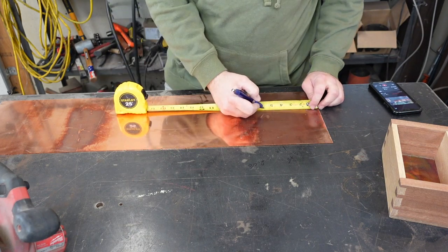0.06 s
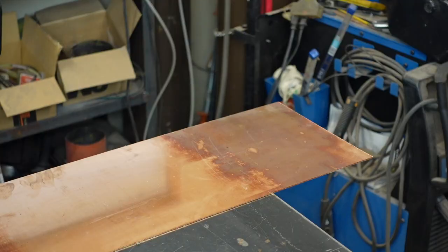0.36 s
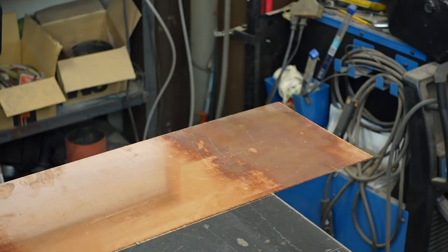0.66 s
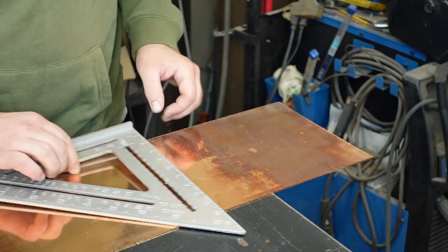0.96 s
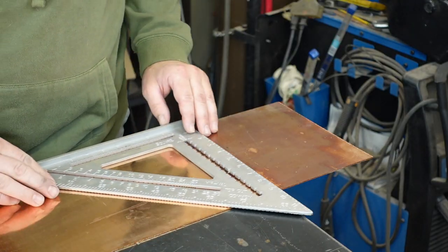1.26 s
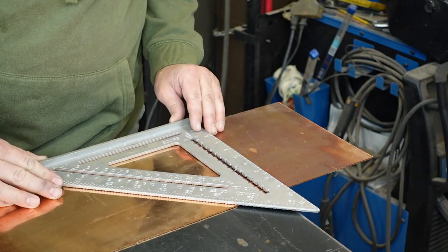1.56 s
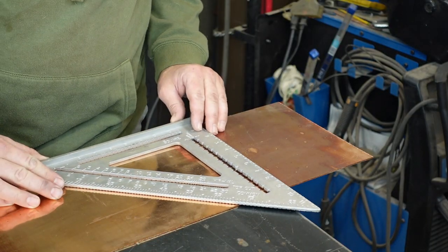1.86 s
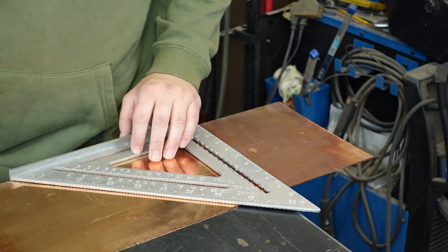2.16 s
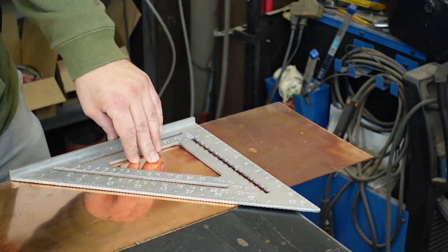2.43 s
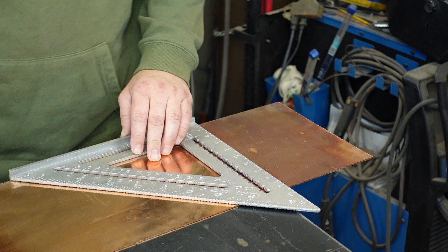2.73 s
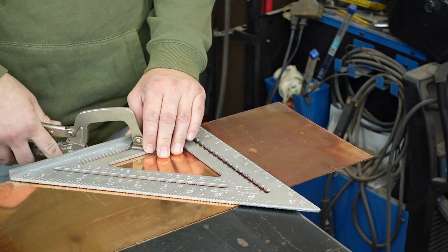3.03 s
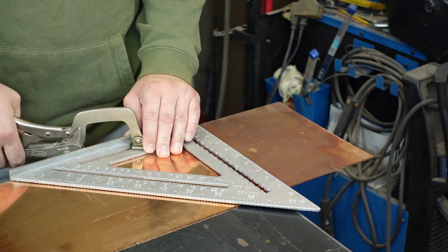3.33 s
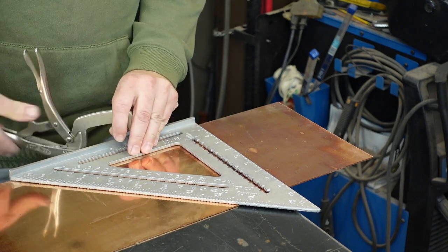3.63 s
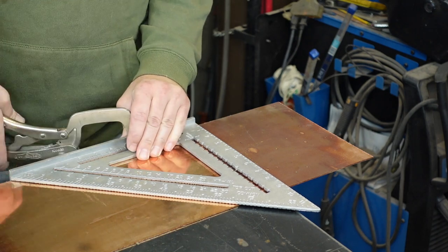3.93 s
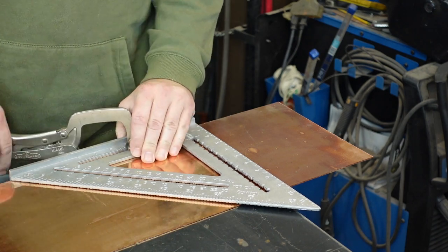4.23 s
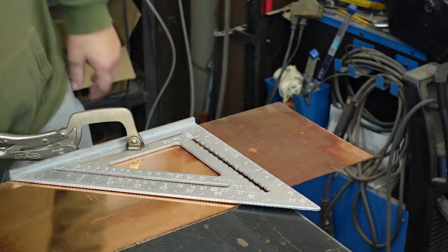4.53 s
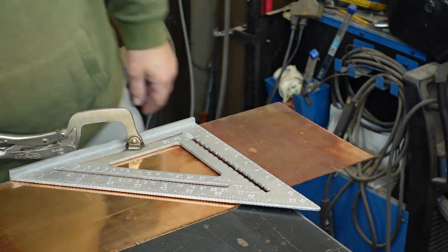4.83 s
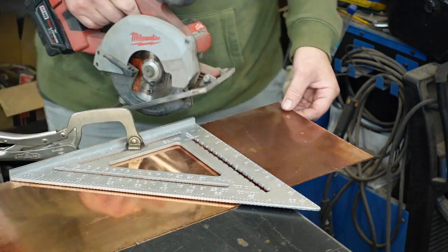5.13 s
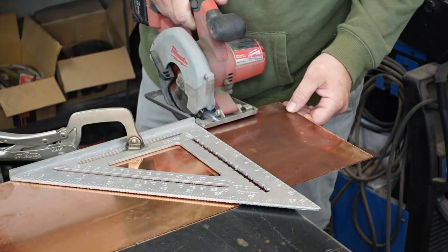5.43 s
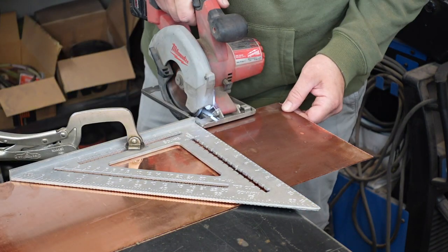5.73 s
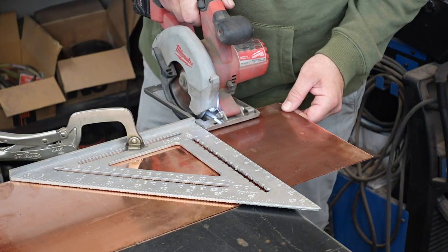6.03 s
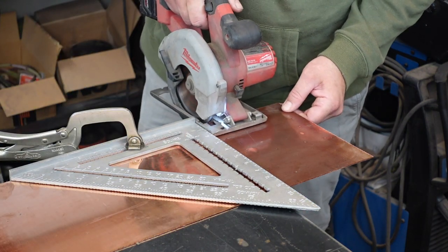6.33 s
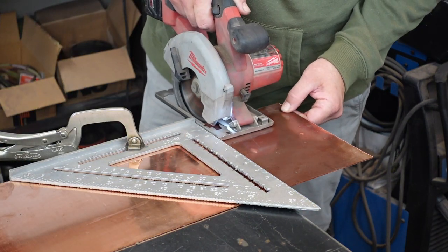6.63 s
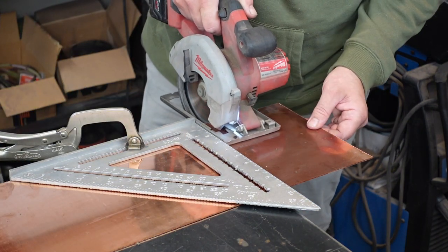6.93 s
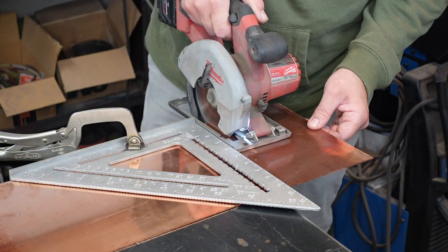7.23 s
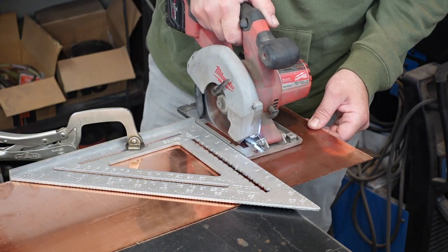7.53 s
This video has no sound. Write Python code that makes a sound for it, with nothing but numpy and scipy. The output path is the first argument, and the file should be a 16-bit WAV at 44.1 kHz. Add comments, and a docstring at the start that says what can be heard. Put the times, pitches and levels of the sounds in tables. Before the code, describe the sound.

A faint low rumble fills a small workshop with little echo, heard on the left channel only. After a soft bump at 0.2 seconds, a copper sheet scrapes briefly across a bench and lands with a ringing knock at about 0.5. A metal square clacks onto it at 1 second, followed by faint rubbing and a lull. Near 2.6 come a rub and another knock. A steel clamp rattles and snaps at 3, 3.5, 3.8 and, hardest, 4.1 seconds, with thin high pings. Light taps and soft rubs follow from 4.7 to 5.4. At 5.7 a trigger clicks and a cordless circular saw spins up quickly to a high, airy whine. At 6.5 it bites into the sheet with a loud, harsh, ringing rasp. The blade swells into a squeal around 7.2, and the cutting continues to the end, at about 7.6 seconds.

```python
"""Clamping and sawing sheet metal

A copper sheet is shifted on a workbench, and an aluminium square is laid on it and clamped down.
Knocks and scrapes make the metal ring; the clamp snaps and rattles. A cordless circular saw spins up,
runs free, then bites into the sheet, and its teeth set the blade ringing. The small workshop has
a low rumble and little echo. There is one microphone, on the left channel only."""
import sys
import numpy as np
from scipy import signal
from scipy.fft import rfft, irfft
from scipy.io import wavfile
from scipy.ndimage import uniform_filter1d

SR = 44100
rng = np.random.default_rng(int(sys.argv[2]) if len(sys.argv) > 2 else 0)


def generate_wav(signal):
    """Clip the signal to [-1, 1] and save it as 16-bit WAV at the path in sys.argv[1]."""
    frames = np.transpose(np.atleast_2d(signal))
    scaled = np.clip(frames, -1, 1) * 32767
    pcm = np.round(scaled).astype(np.int16)
    wavfile.write(sys.argv[1], SR, pcm)


N = 333837
T = np.arange(N) / SR
TRIGGER_S, CUT_START_S = 5.73, 6.498  # the saw starts; the blade meets the sheet
RING_SHARE = .09  # width of a struck or rubbed part's note, as a share of its pitch

# notes at which the sheet and square ring together: pitch_hz, width_hz, boost_db
SHEET_NOTES = [(580, 280, 8), (972, 57, 5), (1568, 84.2, 5), (2550, 90, -3.5), (3057, 90, 4),
               (3660, 120, 2.5), (4830, 70, -4.5), (4960, 90, -10), (5660, 76, -8), (6730, 30, 5),
               (7730, 100, 5), (8500, 90, 6), (8750, 140, 3.5), (11750, 140, -4)]


def undb(db):
    """Turn decibels into a number to multiply by."""
    return 10 ** (np.asarray(db) / 20)


def unit(x):
    """Scale a sound to an average power of 1."""
    return x / np.sqrt(np.mean(x ** 2) + 1e-24)


def wander(rate_hz):
    """A random drift around zero, about 1 in size."""
    return np.interp(T * rate_hz, np.arange(2048), rng.standard_normal(2048)) * np.sqrt(3 / 2)


def colour(x, points, size=4096):
    """Shape the tone along a curve of (pitch_hz, level_db) points."""
    hz, db = np.transpose(points)
    grid = np.maximum(np.fft.rfftfreq(size, 1 / SR), 1)
    gains = undb(np.interp(np.log(grid), np.log(hz), db))
    # build the filter so that it never sounds ahead of its input
    cepstrum = irfft(np.log(gains))
    cepstrum[1:size // 2] *= 2
    cepstrum[size // 2 + 1:] = 0
    return signal.oaconvolve(x, irfft(np.exp(rfft(cepstrum))))[:len(x)]


def resonance(x, hz, width):
    """Keep only the part of a sound that rings near one pitch."""
    return signal.lfilter(*signal.iirpeak(min(hz, SR / 2 - 1000), hz / width, fs=SR), x)


def body(x, notes):
    """An object boosts or weakens the sound at each of its own notes."""
    return x + sum((undb(db) - 1) * resonance(x, hz, width) for hz, width, db in notes)


def lowpass(x, hz):
    """Gently dull the sound above a pitch."""
    return signal.sosfilt(signal.butter(1, min(hz, SR / 2 - 1000), fs=SR, output="sos"), x)


def stroke(start, length, attack_s, release_s, swell_db):
    """Loudness of one push: it sets in, changes by swell_db and is let go."""
    end = start + length
    edges = np.exp(-np.maximum(start - T, 0) / attack_s - np.maximum(T - end, 0) / release_s)
    return edges * undb(np.interp(T, [start, end], [-swell_db, 0]))


def friction(strokes, tone, slip_db, slip_hz, ring, attack_s, release_s, swell_db, edge_db):
    """Surfaces stick and slip in tiny, uneven hits that make the sheet ring."""
    grit = unit(rng.standard_normal(N) * undb(2.5 * rng.standard_normal(N)))
    slips = colour(grit * undb(slip_db * wander(slip_hz)), tone)
    sheet = body(slips, [(hz, width / ring, db * ring) for hz, width, db in SHEET_NOTES])
    return sum(undb(db) * stroke(start, length, attack_s, release_s, swell_db)
               * unit(body(sheet, [(hz, RING_SHARE * hz, edge_db)]))
               for start, length, db, hz in strokes)


def hit(s, scuff_ms, decay_ms, thud_db, bright_db, ring_hz, ring_db):
    """One hit scuffs, cracks and dies away; a heavy one thuds, a hard one is bright."""
    at = int(s * SR)
    span = slice(at - SR // 10, at + SR // 4)
    t = T[span] - T[at]
    rise = np.exp(-abs(t) * 1000 / scuff_ms)
    fall = np.exp(-abs(t) * 1000 / decay_ms) + undb(-22) * np.exp(-abs(t) / .0065)
    crack = 2.6 * (t == 0)
    blow = rng.standard_normal(len(t)) * np.where(t < 0, rise, fall) + crack
    soft, thud = lowpass(blow, 5000), lowpass(blow, 900)
    blow = soft + undb(bright_db) * (blow - soft) + (undb(thud_db) - 1) * thud
    force = np.zeros(N)
    force[span] = body(blow, [(ring_hz, RING_SHARE * ring_hz, ring_db)])
    return force


def rumble(level_db=-65, opening_db=-14.5, dip_db=-8.5, gap_start_s=.145, gap_end_s=.18):
    """Low room rumble; its volume starts low, cuts out briefly, then is turned down as the saw starts."""
    # tone of the rumble: pitch_hz, level_db
    tone = [(25, -12.5), (60, -8), (120, -5.5), (185, -2), (280, -8.5), (450, -16), (750, -19.5),
            (1200, -23), (2400, -31), (3400, -31.5), (5000, -43), (7500, -47.5), (11500, -53.5),
            (15500, -79)]
    steps = np.select([T < gap_start_s, T < gap_end_s, T < TRIGGER_S],
                      [undb(opening_db), 0, 1], undb(dip_db))
    noise = unit(colour(rng.standard_normal(N), tone))
    return noise * uniform_filter1d(steps, SR // 100) * undb(level_db + .15 * wander(16))


def bump():
    """A low, muffled bump starts at once and fades, before the sheet moves."""
    # the bump: start_s, length_s, level_db, ring_hz
    strokes = [(.19, 0.16, -63.5, 242)]
    # its tone: pitch_hz, level_db
    tone = [(30, -13), (70, -6.5), (230, -8), (380, -22.5), (1000, -27), (4000, -55), (16000, -76)]
    return friction(strokes, tone, slip_db=0, slip_hz=29.5, ring=.83,
                    attack_s=.0027, release_s=.015, swell_db=-4, edge_db=7)


def taps():
    """Light touches die at once and mostly sound the note of the part that is hit."""
    # taps of tools, trigger and gears: start_s, level_db, scuff_ms, bright_db, ring_hz
    touches = [(.363, -52.5, 4.3, -25, 3750), (2.785, -67.5, 0.36, 9, 3460), (3.005, -59, 0.29, 13.5, 3460),
               (3.224, -70, .5, -24, 1850), (3.522, -66.5, 0.92, -1, 2320), (4.074, -59.5, 7.4, -22, 2300),
               (4.703, -68.5, 13, -26, 3370), (4.735, -59, 2.5, -20, 2930), (4.746, -57.5, 7.1, -25, 1320),
               (5.371, -62.5, 9.9, -26, 617), (5.726, -57.5, 0.29, -14, 3500),
               (5.754, -52.5, 6.5, -26, 1080)]
    return sum(undb(db) * hit(s, scuff_ms, decay_ms=5, thud_db=-3, bright_db=bright_db,
                              ring_hz=hz, ring_db=18)
               for s, db, scuff_ms, bright_db, hz in touches)


def slides():
    """Metal dragged over the bench makes a bright scrape that rings freely."""
    # drags of the sheet and square: start_s, length_s, level_db, ring_hz
    strokes = [(.446, 0.0066, -43.5, 5730), (.468, 0.01, -46.5, 5100), (.502, 0.023, -54, 3060),
               (.655, 0.006, -62.5, 4200), (.7, 0.036, -54.5, 2550), (.75, 0.016, -50.5, 2550),
               (1.012, 0.012, -48.5, 6900)]
    # tone of the scrape: pitch_hz, level_db
    tone = [(100, -67), (500, -17.5), (1500, -2.5), (3000, 2), (5500, 1.5), (7500, -9), (10000, -15),
            (16000, -39)]
    return friction(strokes, tone, slip_db=2, slip_hz=250, ring=2.1,
                    attack_s=.01, release_s=.0057, swell_db=2, edge_db=6)


def landings(second_edge_s=.01):
    """A flat piece lands on one edge, and the other edge follows a moment later."""
    # sheet and square landing: start_s, level_db, scuff_ms, thud_db, bright_db, ring_hz, second_edge_db
    drops = [(0.546, -34.5, 1.6, -4, -24, 2570, -8.5), (.994, -41, 4.5, -24, -3, 3020, -8),
             (1.063, -49, 6.1, 3.5, 2, 1520, 5.5), (2.662, -38, 9.4, -21, -34, 2950, -26)]
    force = 0
    for s, db, scuff_ms, thud_db, bright_db, hz, second_db in drops:
        piece = dict(thud_db=thud_db, bright_db=bright_db, ring_hz=hz)
        first = hit(s, scuff_ms, decay_ms=8.3, ring_db=8, **piece)
        second = hit(s + second_edge_s, scuff_ms=1.6, decay_ms=6.6, ring_db=-1, **piece)
        force += undb(db) * (first + undb(second_db) * second)
    return force


def rubs():
    """Rubbing is duller and softer, and the sheet rings less under a hand."""
    # hands, sleeves and tools on the bench: start_s, length_s, level_db, ring_hz
    strokes = [(1.215, 0.056, -56.5, 820), (1.31, .015, -64, 820), (2.535, 0.079, -49, 2300),
               (2.83, 0.028, -61.5, 3230), (4.99, .1, -59.5, 3500), (5.16, 0.048, -66, 3500),
               (5.32, 0.011, -52.5, 2140)]
    # tone of the rub: pitch_hz, level_db
    tone = [(80, -27), (300, -1), (800, 0.5), (1700, 4), (3000, 1.5), (4800, -7), (8500, -14.5),
            (12000, -23.5), (16000, -40)]
    return friction(strokes, tone, slip_db=2.5, slip_hz=148.2, ring=.86,
                    attack_s=.013, release_s=.013, swell_db=5.5, edge_db=6.5)


def rattles():
    """The clamp's loose screw and spring chatter with a thin, high ring."""
    # shakes of the clamp: start_s, level_db
    shakes = [(2.727, -64), (2.895, -64), (3.634, -65), (3.742, -74)]
    # note of the loose screw: pitch_hz, width_hz, boost_db
    screw_note = [(11500, 250, 6.5)]
    chatter = sum(undb(db) * hit(s, scuff_ms=5.1, decay_ms=25.4, thud_db=-10, bright_db=-1.5,
                                 ring_hz=3700, ring_db=4)
                  for s, db in shakes)
    return body(chatter, screw_note)


def snaps(bench_hz=565, bench_width_hz=190):
    """The clamp's lever scrapes past its tightest point, the steel rings and the jaw jolts the bench."""
    # lever snaps: start_s, level_db, scuff_ms, bright_db, steel_hz, jaw_hz, jolt_db, boom_db
    lever_snaps = [(3.025, -38.5, 4.9, 11.5, 2900, 474, -11, 3.5),
                   (3.55, -42, 4.4, 13.5, 2560, 850, -1.5, 10),
                   (3.838, -48.5, 8, -9, 3270, 406, -8.5, 10.5),
                   (4.115, -33.5, 1.4, -4.5, 3180, 1470, -16, -4)]
    force = 0
    for s, db, scuff_ms, bright_db, steel_hz, jaw_hz, jolt_db, boom_db in lever_snaps:
        steel = hit(s, scuff_ms, decay_ms=4.2, thud_db=-4.5, bright_db=bright_db,
                    ring_hz=steel_hz, ring_db=9.5)
        jolt = hit(s, scuff_ms=2.8, decay_ms=3.3, thud_db=1, bright_db=-18.5, ring_hz=jaw_hz, ring_db=16.5)
        force += undb(db) * body(steel + undb(jolt_db) * jolt, [(bench_hz, bench_width_hz, boom_db)])
    return force


def knocks(gain_db=5):
    """Every landing, snap, tap and rattle sounds through the sheet and the square."""
    # tone of the hits: pitch_hz, level_db
    tone = [(60, -7), (250, 2.5), (600, -3), (1200, -2), (3000, -2.5), (5000, -5.5), (9000, -8),
            (11500, -12.5), (13000, -19.5), (16000, -22.5)]
    force = landings() + snaps() + taps() + rattles()
    return undb(gain_db) * body(colour(force, tone), SHEET_NOTES)


def pings(attack_s=.0014, buzz=.41):
    """The clamp's lever, spring and screw ring briefly, buzzing in their loose joints."""
    # small steel parts: start_s, level_db, pitch_hz, fade_s (time to fall by 60 dB)
    parts = [(3.655, -67, 5690, 0.063), (3.823, -47.5, 5290, 0.084), (3.823, -51, 10600, 0.046),
             (3.824, -57.5, 8480, 0.047), (4.111, -51, 6520, 0.1)]
    out = np.zeros(N)
    t = T[:SR // 3]
    for s, db, hz, fade_s in parts:
        at = int(s * SR)
        ring = np.sin(2 * np.pi * hz * t + buzz * wander(550)[:len(t)])
        loudness = (1 - np.exp(-t / attack_s)) * np.exp(-np.log(1000) * t / fade_s)
        out[at:at + len(t)] += undb(db) * loudness * ring
    return out


def motor(level_db=-47.5, spin_up_s=.118, cut_slowdown=.035, free_turn_hz=57.2):
    """Gears whine as they reach speed; fan air and gear rattle throb once a turn inside the housing."""
    # gear and motor whine at full speed: pitch_hz, level_db
    whine_notes = [(1264, -20), (1420, -21), (1599, -14), (1688, -18), (1904, -22), (2030, -17),
                   (2132, -19), (2185, -19), (2979, -23), (3714, -25), (3878, -23), (4963, -20),
                   (5746, -24), (6395, -27), (9997, -36), (15062, -48)]
    # tone of the air and gear noise: pitch_hz, level_db
    tone = [(40, -53), (130, -15.5), (300, -3), (900, -2.5), (1700, 1.5), (3700, 0), (4400, -11),
            (6100, -5.5), (6800, -14.5), (10500, -21.5), (11800, -24), (12400, -36), (16000, -24)]
    # notes of the housing: pitch_hz, width_hz, boost_db
    housing_notes = [(1730, 85, 9.7), (2025, 190, 10.3), (3930, 75, 8.6), (5640, 220, 11.8), (6220, 170, 7),
                     (8450, 340, 8), (9020, 320, 17.7), (11470, 400, 21.3)]
    spun_up = np.clip((T - TRIGGER_S) / spin_up_s, 0, 1)
    speed = np.sqrt(spun_up) * (1 - cut_slowdown * blade_depth()) * (1 + .001 * wander(12))
    soft_start_db = np.interp(spun_up, [.8, 1], [-2, 0])
    phase = 2 * np.pi * np.cumsum(speed) / SR
    whine = sum(undb(db + 2.5 * wander(30)) * np.sqrt(2) * np.sin(hz * phase + .35 * wander(40))
                for hz, db in whine_notes)
    flicker = undb(1.1 * wander(90))
    throb = 1 + .31 * np.sin(free_turn_hz * phase)
    noise = rng.standard_normal(N) * throb * flicker
    rattle = unit(body(colour(noise, tone), housing_notes))
    return speed * undb(level_db + soft_start_db) * (speed ** 12 * whine + undb(-2) * rattle)


def blade_depth(sink_s=.2):
    """How far the blade has sunk into the sheet, from 0 to 1: fast at first, then ever slower."""
    return np.sqrt(1 - np.exp(-np.maximum(T - CUT_START_S, 0) / sink_s))


def chips(turn_hz=50, teeth=30):
    """Each tooth tears off a chip of random size in a tiny burst of noise."""
    # tone of the tearing: pitch_hz, level_db
    tone = [(30, -12), (60, -14.5), (100, -7), (160, -15.5), (450, -9), (900, -7), (1600, -2.5), (2800, -1),
            (4000, -11), (6500, -7), (9500, -9), (12500, -13.5), (15800, -16.5)]
    turns = np.cumsum(turn_hz * (1 + .025 * wander(8))) / SR
    tooth, progress = np.divmod(turns * teeth, 1)
    size = undb(1.2 * rng.standard_normal(N // 10))[tooth.astype(int)]
    bursts = size * np.exp(-progress / .84) * rng.standard_normal(N)
    wobble = 1 + .18 * np.sin(2 * np.pi * turns)
    return unit(colour(bursts * wobble, tone))


def cut(level_db=-44.5, push_db_per_s=1.0, sing_db=1.26):
    """The saw is pushed ever harder; the slot pinches the ringing blade, so its notes swell in turn."""
    # notes of the blade: pitch_hz, width_hz, boost_db, entry_db (added as the blade enters)
    blade_notes = [(959, 16, 11, -4), (1338, 18, 9.5, -4), (1738, 20, 7, 0), (1894, 18, 10, 0),
                   (2003, 24, 19.5, -4), (2130, 40, 3, 6), (2600, 80, 5.5, 3), (3214, 35, 13.5, -2),
                   (3490, 60, 10, 7), (4307, 25, 7, 0), (4646, 18, 14.5, -4), (5399, 45, 11, 0),
                   (5486, 50, 12, 1), (6020, 60, 9, 3), (6250, 140, 9, 0), (6934, 40, 7, 0),
                   (7192, 30, 9, -2), (7450, 42, 16, -2), (8349, 45, 13, 0), (8640, 70, 12, -1),
                   (8970, 120, 18, -3), (9800, 90, 11, -1), (10400, 130, 14, 1), (10815, 50, 7, 3),
                   (11246, 35, 13, 0), (12010, 90, 10, 0), (12780, 40, 9, 0)]
    tearing = chips()
    entering = np.interp(T, [6.65, 6.77], [1, 0])
    ring = 0
    for hz, width, db, entry_db in blade_notes:
        note = resonance(tearing, hz, width)
        # rubbing in the slot feeds a weak swing and calms a strong one, so the note sings on
        energy = np.abs(uniform_filter1d(unit(note) ** 2, SR // 300)) + 1e-3
        steadied = note * energy ** -.16
        pinch_db = 2.1 * wander(9) + 1.2 * wander(45)
        boost_db = db + entry_db * entering + pinch_db + sing_db + squeal_db(hz)
        ring += steadied * (undb(boost_db) - 1)
    push = undb(level_db + push_db_per_s * (T - CUT_START_S))
    return np.sqrt(blade_depth()) * push * (tearing + ring)


def squeal_db(note_hz):
    """One note of the blade swells into a squeal while the slot pinches it."""
    # squeals: peak_s, spread_s, pitch_hz, boost_db
    squeals = [(7.22, .17, 2003, 2), (7.27, .11, 4646, 9)]
    return sum(db * np.exp(-((T - s) / spread) ** 2) for s, spread, hz, db in squeals if hz == note_hz)


def workshop(x, fade_s, wet_db, dull_hz=6000):
    """Cluttered walls add a short, dull echo."""
    t = T[:SR // 2]
    fade = np.exp(-np.log(1000) * t / fade_s) * (t > .004)
    tail = lowpass(rng.standard_normal(len(t)), dull_hz) * fade
    return x + undb(wet_db) * signal.oaconvolve(x, tail / np.linalg.norm(tail))[:N]


def scene():
    """Handling and saw share the workshop; the right channel is silent."""
    handling = workshop(knocks() + pings() + slides() + rubs() + bump(), fade_s=.09, wet_db=-12)
    saw = workshop(motor() + cut(), fade_s=.056, wet_db=-11)
    left = 2 * (handling + saw + rumble())
    return np.array([left, np.zeros(N)])


def record(dry):
    """The recorder cuts off the highest treble."""
    top_hz = 15750
    return signal.sosfilt(signal.ellip(10, .2, 70, top_hz, fs=SR, output="sos"), dry)


dry = scene()
out = record(dry)
generate_wav(out)
```